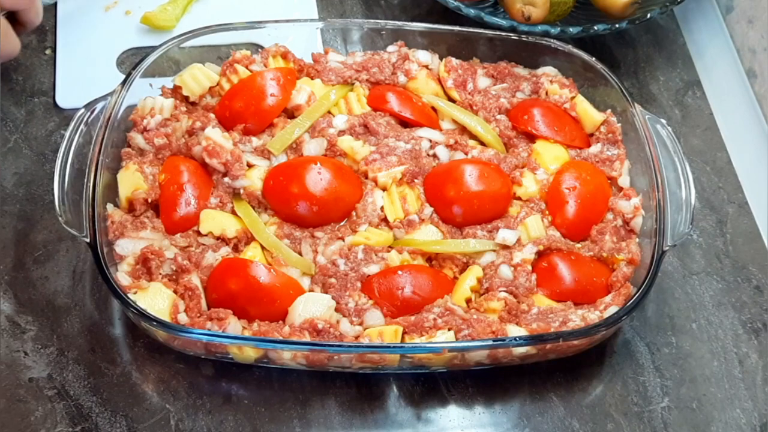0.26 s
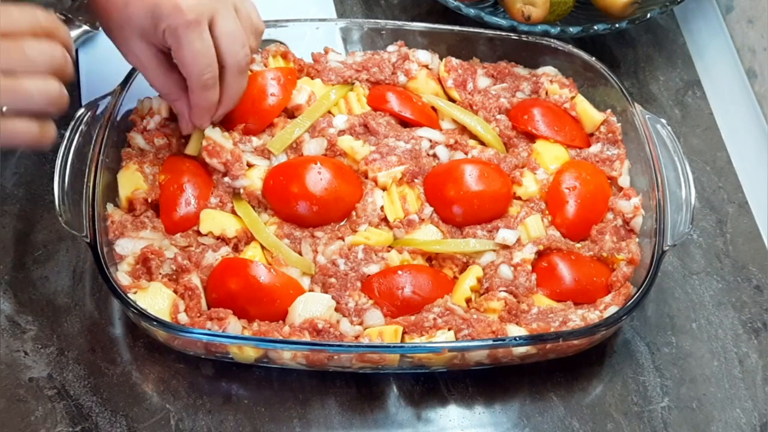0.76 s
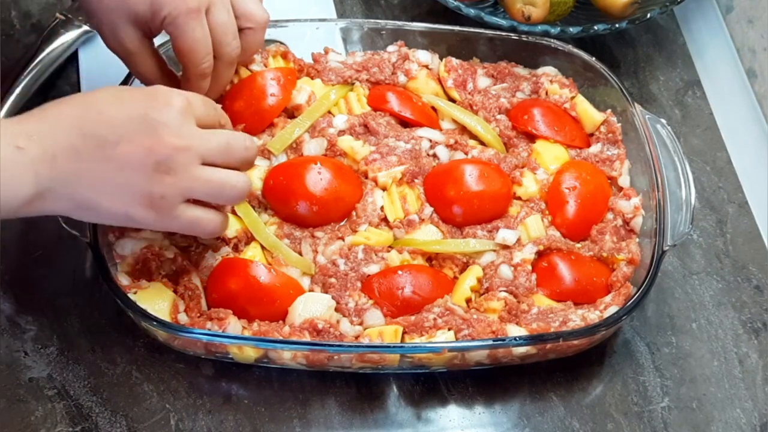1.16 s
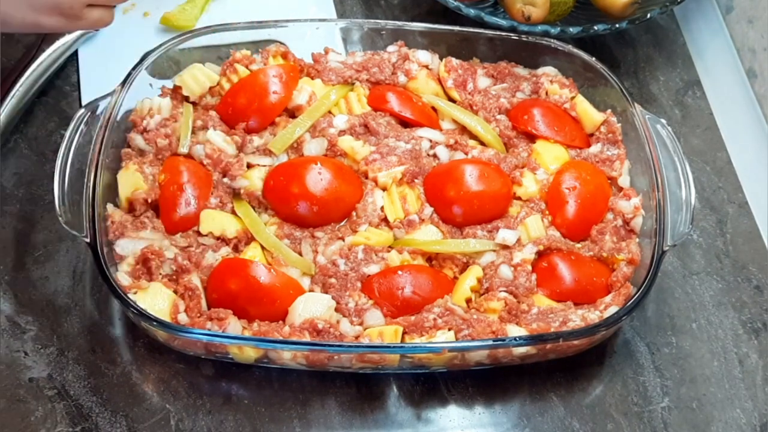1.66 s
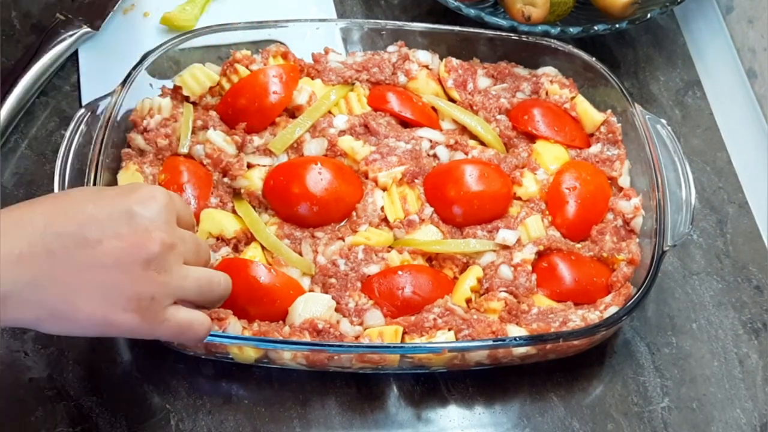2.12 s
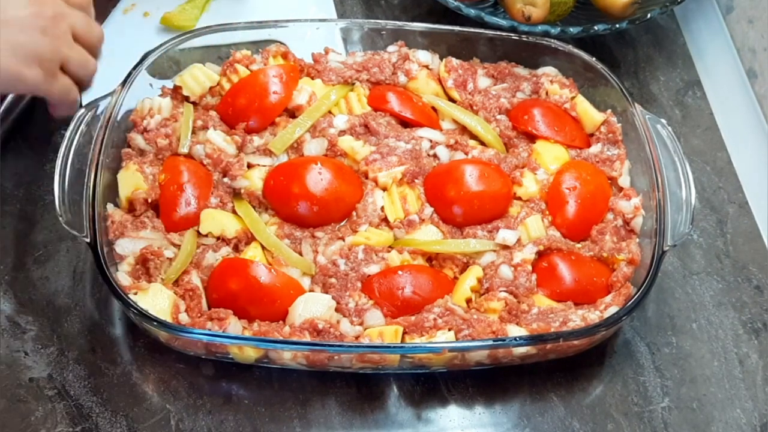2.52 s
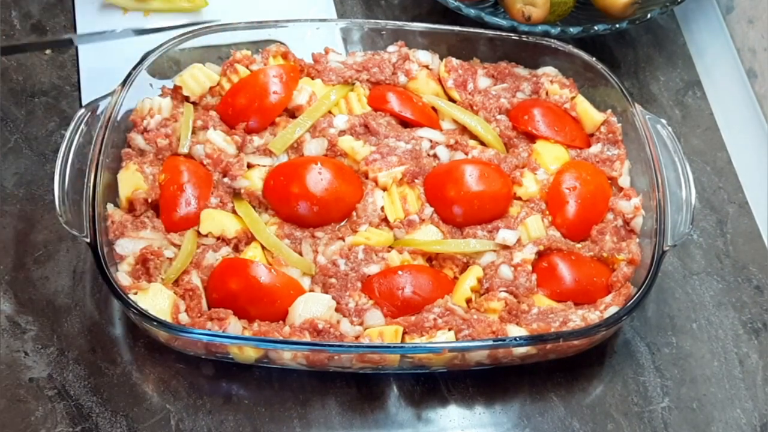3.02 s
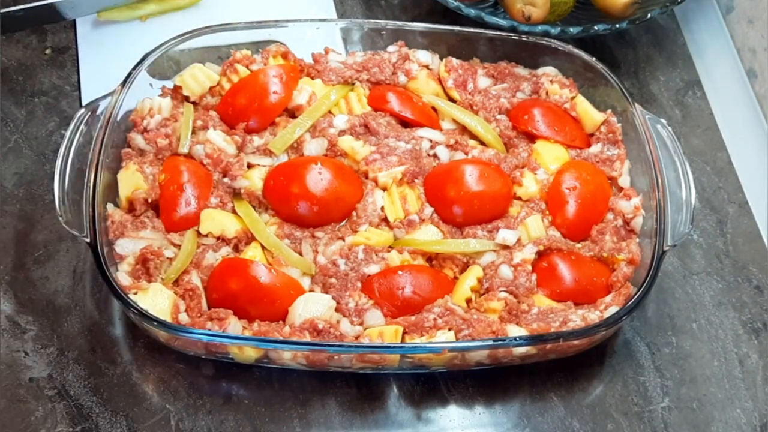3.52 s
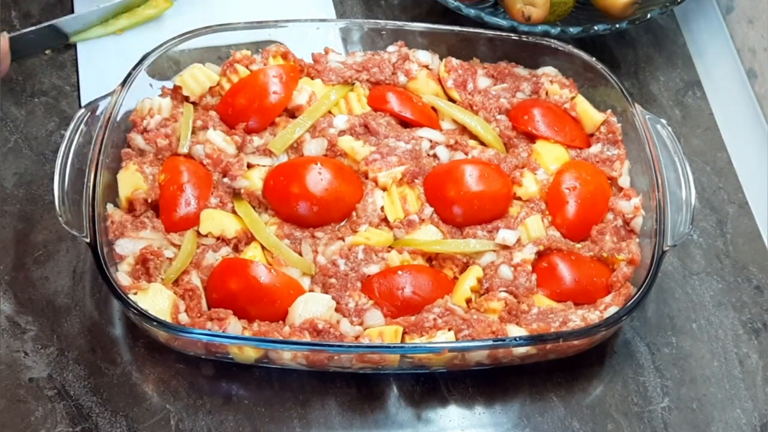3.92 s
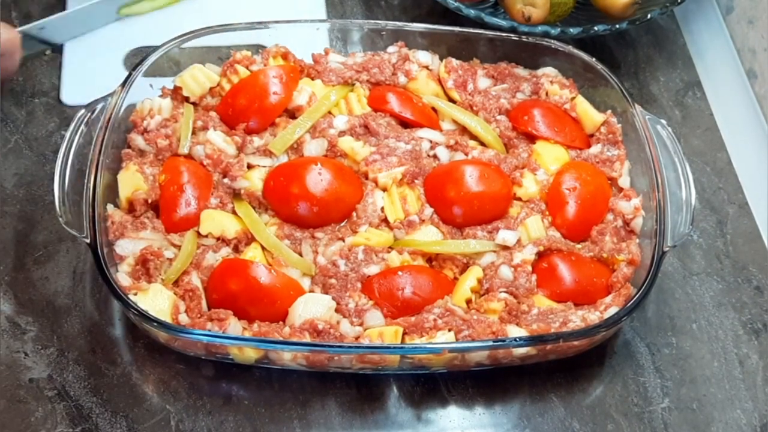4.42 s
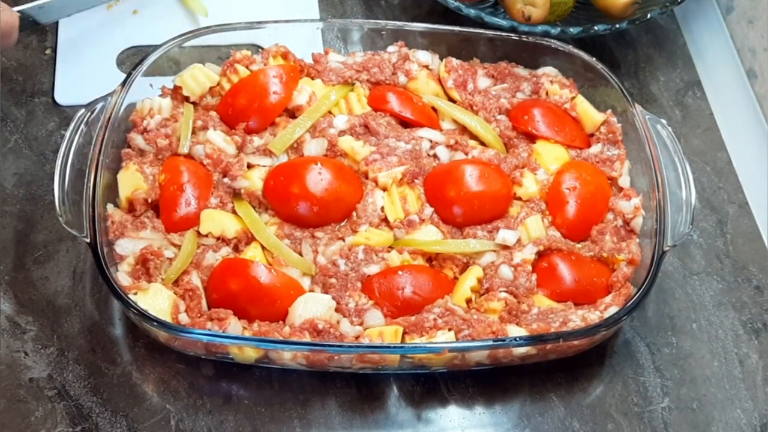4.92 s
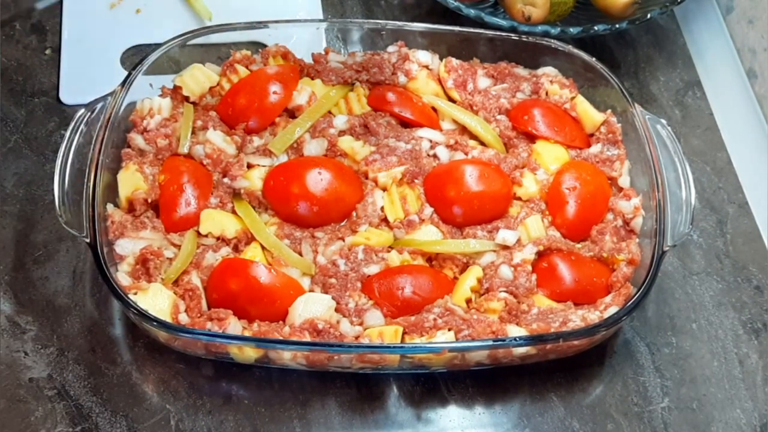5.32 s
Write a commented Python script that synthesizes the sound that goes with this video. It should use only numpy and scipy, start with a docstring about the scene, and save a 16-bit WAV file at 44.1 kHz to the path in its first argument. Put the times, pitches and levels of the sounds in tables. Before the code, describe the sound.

Pickles are cut on a board with moist crunches, blade clicks and knocks in small bursts, over a steady fan hum in a kitchen.

```python
"""Pickles are cut on a board and pressed into the meat in a glass baking dish, on a kitchen worktop.
The blade crunches through, made of tiny noise snaps coloured by steel resonances, and knocks down:
clicks ring the shared modes of board, dish and worktop, and scatter into echoes. Faint bright high tones
flutter and die away, the hands' soft rustle is swelling snaps, and a fan in the small, hard room is
coloured noise with narrow bands of hum."""
import sys
import numpy as np
from scipy import signal
from scipy.fft import rfft, irfft, next_fast_len
from scipy.io import wavfile
from scipy.ndimage import uniform_filter1d

SR = 44100
rng = np.random.default_rng(int(sys.argv[2]) if len(sys.argv) > 2 else 0)


def pcm_store(signal):
    """Save signal as 16-bit PCM."""
    levels = np.round(np.clip(np.atleast_2d(signal), -1, 1) * 32767)
    wavfile.write(sys.argv[1], SR, levels.astype(np.int16).T)


N = 245637
CLOCK = np.arange(N) / SR  # seconds
SHORT = CLOCK[:SR // 2]  # the half second given to each single sound


def gain_of(db):
    """Turns decibels into an amplitude factor."""
    return 10 ** (np.asarray(db) / 20)


def evened(x):
    """Scales a sound to rms 1."""
    return x / np.sqrt(np.mean(x ** 2) + 1e-20)


def read(points, hz):
    """Reads a curve at hz, with straight lines between its points on a log-frequency axis."""
    point_hz, value = np.transpose(points)
    return np.interp(np.log(hz + 1), np.log(point_hz), value)


def coloured(x, db_at):
    """Filters x by a rule that gives dB for each frequency."""
    length = x.shape[-1]
    size = next_fast_len(length)
    spectrum = rfft(x, size) * gain_of(db_at(np.fft.rfftfreq(size, 1 / SR)))
    return irfft(spectrum, size)[..., :length]


def cut(x, hz, kind, order):
    """Keeps what lies below hz (kind "low") or above it (kind "high")."""
    return signal.sosfilt(signal.butter(order, hz, kind, fs=SR, output="sos"), x)


def dying(t, t60):
    """Falls 60 dB in t60 seconds."""
    return np.exp(-np.log(1000) * t / t60)


def waver(size, hz):
    """Slow random wandering of rms 1, up to about hz."""
    return evened(cut(rng.standard_normal(size), hz, "low", order=2))


def grains(size, per_s):
    """Tiny snaps of random size at random moments, separate in the two channels."""
    happens = rng.random((2, size)) < per_s / SR
    return evened(rng.standard_normal((2, size)) * happens)


def add(mix, s, sound):
    """Lays a stereo sound into the mix from time s."""
    part = mix[:, round(s * SR):][:, :sound.shape[1]]
    part += sound[:, :part.shape[1]]


# The colour of the fan's air noise. Each row: frequency in Hz, relative level in dB per Hz.
FAN_COLOUR = [(15, -60), (25, -21.5), (102, -1), (170, -2), (190, -12.5), (263, -6), (326, -15), (363, -8),
              (503, -14.5), (560, -14), (962, -14), (1230, -19.5), (1840, -24), (2910, -50.5), (16000, -60)]
# Narrow bands of hum. Each row: centre in Hz, rms level in dB.
FAN_HUMS = [(104, -61.5), (166, -62.5), (218, -60), (270, -60.5), (380, -82), (985, -66.5), (1233, -82)]
# How alike the fan is at left and right. Each row: frequency in Hz,
# likeness (1 is the same, 0 unrelated, negative leans to opposite).
LIKENESS = [(60, 0.94), (130, 1), (290, 0.67), (640, 0.46), (1410, -0.41), (3100, 0.12)]
# How much the higher part of the air noise is lifted over time. Each row: time in seconds, lift in dB.
RUSH = [(0, 12), (.8, 8.5), (1.3, 5), (2, 5.5), (2.5, 3), (4.4, -1.5), (5.3, 0.5), (5.55, -6.5)]
AIR_DB = -50  # rms level of the air noise before its rush is lifted


def fan(hum_half_width_hz=11, rush_above_hz=420):
    """Air noise whose rush changes in level, with narrow humming bands; the bass is nearly the same at both ears."""
    hz = np.fft.rfftfreq(N, 1 / SR)
    left, other = rfft(rng.standard_normal((2, N)))
    same = read(LIKENESS, hz)
    pair = np.array([left, same * left + np.sqrt(1 - same ** 2) * other])
    air = gain_of(AIR_DB) * evened(irfft(pair * gain_of(read(FAN_COLOUR, hz)), N))
    hum = np.zeros((2, N))
    for centre_hz, db in FAN_HUMS:
        band = pair / (1 + ((hz - centre_hz) / hum_half_width_hz) ** 2)
        hum += gain_of(db) * evened(irfft(band, N))[:, ::-1]  # played backwards, to differ from the air
    rush = coloured(air, lambda f: -20 * np.log10(1 + (rush_above_hz / (f + 1)) ** 2))
    lift = gain_of(np.interp(CLOCK, *np.transpose(RUSH)))
    return air + rush * (lift - 1) + hum


# Faint bright groups of high tones. Each row: start in seconds, level in dB, rise in seconds,
# ring time as a factor, tilt in dB per octave around 6000 Hz.
HIGH_TONES = [(.007, -50.5, 0.014, 1., -5.5), (2.696, -59, 0.0049, 0.87, 5.5),
              (3.491, -70.5, 0.0018, 0.79, 12)]
# The tones in each group, about 1 kHz apart in the upper part. Each row: frequency in Hz,
# relative level in dB, seconds to fall 60 dB at factor 1.
TONE_PARTIALS = [(3370, -11, .14), (3962, 1, .2), (4320, 1, .19), (5000, -2, .13), (5370, -3, .12),
                 (6020, -6, .13), (6990, -1, .13), (8020, -4, .12), (9010, -7, .15), (10030, -6, .17),
                 (11020, -8, .13)]


def high_tones(flutter=0.43, flutter_hz=110):
    """A group of high tones whose levels flutter at random, each reaching the ears in its own phase."""
    out = np.zeros((2, N))
    for s, level_db, rise_s, ring, tilt_db in HIGH_TONES:
        swell = 1 - np.exp(-SHORT / rise_s)
        for hz, db, t60 in TONE_PARTIALS:
            wander = cut(rng.standard_normal((2, len(SHORT))), flutter_hz, "low", order=2)
            fluttering = 1 + flutter * evened(wander)
            phase = rng.random((2, 1))
            tone = fluttering * np.sin(2 * np.pi * (hz * SHORT + phase))
            level = gain_of(level_db + db + tilt_db * np.log2(hz / 6000))
            add(out, s, level * tone * dying(SHORT, ring * t60) * swell)
    return out


# Hands moving over the food. Each row: middle in seconds, level there in dB,
# seconds from the middle until it has faded by about 9 dB.
HANDLING = [(0.054, -69, 0.073), (0.354, -61.5, 0.11), (.74, -67.5, 0.13), (1.122, -78, 0.11),
            (1.405, -69, 0.037), (1.69, -65, 0.064), (2.5, -80.5, 0.25), (3.004, -72, 0.084),
            (3.677, -63.5, 0.075), (4.135, -65.5, 0.1), (4.453, -60, 0.083), (5.36, -66.5, 0.13)]
# The colour of wet food, shared by the rustle and the crunches. Each row: frequency in Hz,
# relative level in dB per Hz.
WET_COLOUR = [(150, -37), (500, -1.5), (1500, -1.5), (2500, -2.5), (3700, -8), (5500, -9), (8200, -8),
              (10000, -13), (15000, -12)]


def handling(clump_db=1.5, clump_hz=25):
    """A soft, moist rustle, uneven in level, that swells and fades with each move of the hands."""
    rustle = evened(coloured(grains(N, per_s=3700), lambda hz: read(WET_COLOUR, hz)))
    moves = sum(gain_of(db) * np.exp(-((CLOCK - s) / half_s) ** 2) for s, db, half_s in HANDLING)
    return rustle * moves * gain_of(clump_db * waver(N, clump_hz))


def scatter(near_t60=0.05, room_t60=0.27, room_db=-15, low_hz=300):
    """Dense, colourless reflections off worktop and tiles, then the room; different at each ear, and without bass."""
    fade = dying(SHORT, near_t60) + gain_of(room_db) * dying(SHORT, room_t60)
    spectrum = rfft(rng.choice([-1., 1.], (2, len(SHORT))) * fade)
    smooth_power = uniform_filter1d(abs(spectrum) ** 2, size=60, axis=1)
    echoes = irfft(spectrum / np.sqrt(smooth_power), len(SHORT))  # levelled, so no colour is left
    fade_out = np.cos(np.pi / 2 * SHORT / SHORT[-1]) ** 2
    return cut(echoes * fade_out, low_hz, "high", order=2)


CONTACT_CYCLES = 2.03  # a blow's swell takes about this many cycles of its highest frequency
SCATTER_AT_1KHZ, SCATTER_POWER = 0.91, 0.43  # brighter blows scatter more


def blow(body, db, low_hz, high_hz, direct_db=-1, direct_hz=1500, blow_s=0.012):
    """One contact rings the modes; a soft one swells slowly and leaves out the treble, a light one the bass."""
    ring = cut(cut(body, low_hz, "high", order=3), high_hz, "low", order=3)
    echoes = signal.fftconvolve(ring[None], scatter(), axes=1)[:, :len(SHORT)]
    scattered = SCATTER_AT_1KHZ * (high_hz / 1000) ** SCATTER_POWER
    direct = gain_of(direct_db) * cut(ring, direct_hz, "low", order=1)
    sound = direct + scattered * echoes
    sound = sound * (1 - np.exp(-SHORT * high_hz / CONTACT_CYCLES))
    # same energy for every blow, before db: as if rms 1 for blow_s in both channels
    return gain_of(db) * sound / np.sqrt(np.sum(sound ** 2) / (2 * blow_s * SR))


# Knocks on board and dish. Each row: start in seconds, rap level in dB, Hz below which the rap is thin,
# Hz above which it is dull, thump level in dB, dB lost at each further contact (negative grows louder).
KNOCKS = [(.295, -23, 1130, 2150, -27.5, 10), (0.3, -28, 1190, 2380, -40, 18),
          (.369, -31, 447, 640, -41, 3), (.395, -33, 35.5, 81, -64, 14),
          (.5628, -25.5, 570, 1090, -35.5, 0.5), (.605, -29, 384, 1190, -29.5, 4),
          (.637, -37.5, 500, 1640, -37, 6.5), (.685, -28, 396, 1050, -36, 14),
          (0.732, -46, 1290, 1600, -55, 16), (1.015, -39, 50, 188, -52, 25),
          (1.396, -41, 130, 192, -53, 11), (1.572, -46.5, 500, 1510, -63, -1),
          (1.811, -39.5, 600, 1370, -50, 11), (3.753, -43.5, 700, 1590, -57, 0),
          (3.769, -37.5, 397, 467, -56, 14), (3.82, -40.5, 415, 526, -54, 13),
          (3.951, -35, 327, 840, -59, 7), (3.962, -32, 666, 2350, -22.5, 2.5),
          (3.9755, -29.5, 300, 1920, -18.5, 5.5), (4.452, -40.5, 500, 745, -62, -2),
          (4.463, -29.5, 626, 766, -32, 3.5), (4.489, -37.5, 600, 826, -29, 3),
          (4.741, -53.5, 1200, 2200, -51, 1), (4.997, -33.5, 960, 2020, -46.5, 5),
          (5.004, -37.5, 372, 620, -39.5, 5), (5.034, -50, 700, 2310, -60, 10)]
# What board, dish and worktop ring with. Each row: frequency in Hz, dB over the bare click,
# seconds to fall 60 dB.
BODY_MODES = [(173.3, 11, 0.39), (237.5, 17, 0.093), (325, 11.5, 0.041), (390.5, 11.5, 0.096),
              (466, 9, 0.026), (552, 7.5, 0.076), (638, 9, 0.099), (722.6, 7.5, 0.064), (770, -2.5, 0.099),
              (879.5, -7.5, 0.014), (965.6, -0.5, 0.058), (1273, 0, 0.077), (1405, 2, 0.036),
              (1540, -0.5, 0.0242), (1680, 1.5, 0.039), (2278, 3, 0.024), (2520, 4.5, 0.057),
              (3290, 1, 0.12)]
CHATTER_S, CHATTER_SLOWING = .0062, 1.4  # usual first gap between contacts; growth factor for each next gap
CHATTER_UNEVEN = .15  # share by which a gap varies at random
THUMP_LOW_HZ, THUMP_HIGH_HZ = 210, 354  # range of the board's thump
WORKTOP_LOW_HZ, WORKTOP_HIGH_HZ, WORKTOP_DB = 57.9, 106, -16  # the worktop's boom; dB relative to the thump


def knocks(count=4):
    """Each knock is a rap that chatters through count contacts, over a board thump and a worktop boom."""
    body = np.zeros(len(SHORT))
    for hz, db, t60 in BODY_MODES:
        per_sample = 2 * np.log(1000) / (t60 * SR)  # makes db the height of the peak in the spectrum
        body += gain_of(db) * per_sample * dying(SHORT, t60) * np.cos(2 * np.pi * hz * SHORT)
    body[0] += 1  # the bare click
    out = np.zeros((2, N))
    boom = blow(body, WORKTOP_DB, WORKTOP_LOW_HZ, WORKTOP_HIGH_HZ)
    for s, rap_db, low_hz, high_hz, thump_db, loss_db in KNOCKS:
        thump = blow(body, thump_db, THUMP_LOW_HZ, THUMP_HIGH_HZ)
        add(out, s, thump + gain_of(thump_db) * boom)
        rap = blow(body, rap_db, low_hz, high_hz)
        for k in range(count):
            add(out, s, gain_of(-k * loss_db) * rap)
            uneven = 1 + CHATTER_UNEVEN * rng.uniform(-0.988, 1)
            s += CHATTER_S * CHATTER_SLOWING ** k * uneven
    return out


# Resonances of the steel blade. Each row: frequency in Hz, width in Hz,
# dB over the bare crunch at ring factor 1.
BLADE = [(2970, 57, 3), (3760, 36, 11), (4320, 110, 9), (4630, 62, 10), (5110, 40, 8), (5370, 55, 6),
         (6100, 100, 8), (6100, 45, -1), (6600, 35, 12.5), (7500, 83, 6.5), (8250, 400, 3.5)]


def blade_db(hz, ring):
    """The blade's resonances stand out of a crunch as far as it rings freely."""
    power = sum(gain_of(db) ** 2 / (1 + (2 * (hz - f) / width) ** 2) ** 2 for f, width, db in BLADE)
    return 10 * np.log10(1 + ring ** 2 * power)


# The blade crunching through wet flesh. Each row: peak in seconds, level in dB, rise in seconds,
# tilt in dB per octave above 500 Hz, blade ring as a factor.
CRUNCHES = [(0.299, -32.5, 0.0039, -1.5, 0.39), (.535, -53.5, 0.027, -2.5, .2),
            (0.571, -46.5, 0.014, -3, 1), (0.603, -41, .011, -3.5, 1.64), (.686, -48, .005, -5, 2),
            (0.915, -52.5, 0.032, -6, 0.25), (1.571, -44.5, 0.0041, 0, 0.99), (1.6, -44, 0.02, -6, 1.9),
            (1.81, -43, 0.004, 2, 1.3), (1.829, -45, 0.012, -1.5, 1.4), (2.593, -66.5, .006, -1, .5),
            (2.712, -53, 0.02, -3, 0.49), (3.528, -60, 0.0048, 5, 0.34), (3.615, -56.5, 0.0072, 5, .3),
            (3.764, -42, 0.026, -0.3, 0.58), (3.877, -52, 0.029, 1, .4), (3.966, -37, 0.011, -6.5, 0.69),
            (3.995, -37, 0.023, -6.5, .8), (4.0604, -43, 0.00036, -1.5, .1), (4.386, -42.5, 0.0013, 7, 1.5),
            (4.409, -49, 0.0091, -2.5, .3), (4.474, -37, 0.007, -3.5, .3), (4.754, -46, 0.0058, -2.5, .2),
            (4.965, -54.5, .001, 9, .3), (5., -50, 0.025, 3, .1), (5.01, -37, 0.015, -5.5, 0.87),
            (5.037, -50, 0.0011, -1, .4), (5.19, -58, .006, -5, 0.88), (5.222, -55.5, 0.027, -5, 0.9)]
# a crunch with this rise falls 60 dB in this time; a slower one lasts longer, by this power
CRUNCH_T60_S, CRUNCH_RISE_S, CRUNCH_POWER = 0.17, 0.017, 0.44


def crunches(room_db=-25, room_t60=0.45, clump_db=1.5, clump_hz=60):
    """Cells burst in clumps as the pressure builds, then the crackle dies in the room."""
    out = np.zeros((2, N))
    t = SHORT - SHORT[-1] / 4  # the peak is at 0
    before, after = np.minimum(t, 0), np.maximum(t, 0)
    for s, db, rise_s, tilt_db, ring in CRUNCHES:
        def colour(hz):
            tilt = tilt_db * np.log2(np.maximum(hz, 500))
            return read(WET_COLOUR, hz) + tilt + blade_db(hz, ring)

        clumps = gain_of(clump_db * waver(len(t), clump_hz))
        crackle = coloured(clumps * grains(len(t), per_s=8200), colour)
        t60 = CRUNCH_T60_S * (rise_s / CRUNCH_RISE_S) ** CRUNCH_POWER
        fade = dying(after, t60) + gain_of(room_db) * dying(after, room_t60)
        swell = np.exp(before / rise_s) * fade
        add(out, s + t[0], gain_of(db) * swell * evened(crackle))
    return out


# How the whole sound leans to one side. Each row: frequency in Hz, left minus right in dB.
BALANCE_DB = [(60, -2), (200, -5), (380, -0.5), (700, -0.5), (4400, -1), (8000, -1), (14000, 4.5)]


def scene():
    """Everything at the worktop; the bass sits a little to the right, the highest treble to the left."""
    mix = fan() + high_tones() + handling() + knocks() + crunches()
    half_each = np.array([[.5], [-.5]])
    return coloured(mix, lambda hz: half_each * read(BALANCE_DB, hz))


EDGE_HZ = 15900


def record(dry):
    """A steep low-pass filter takes away what lies above EDGE_HZ."""
    low_pass = signal.firwin(511, EDGE_HZ, window=("kaiser", 9), fs=SR)
    return signal.oaconvolve(dry, low_pass[None], "same")


dry = scene()
out = record(dry)
pcm_store(out)
```